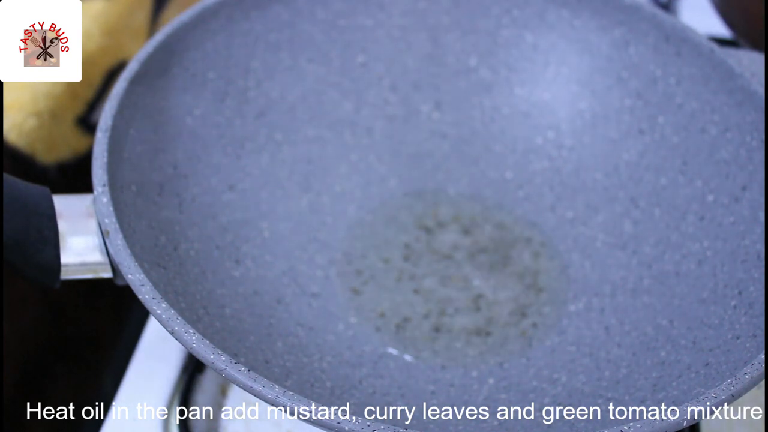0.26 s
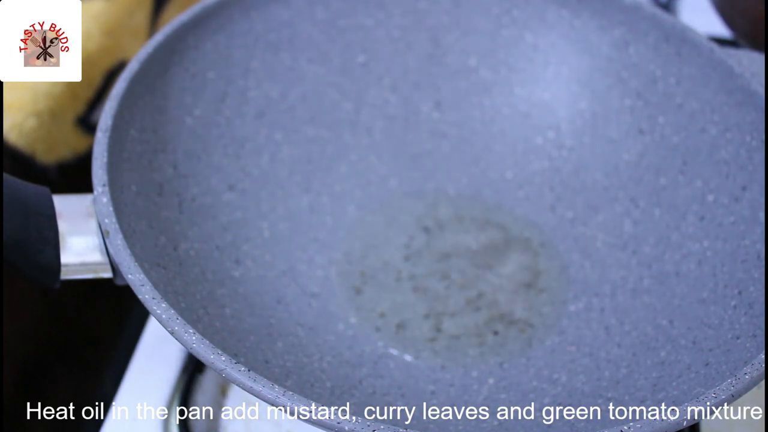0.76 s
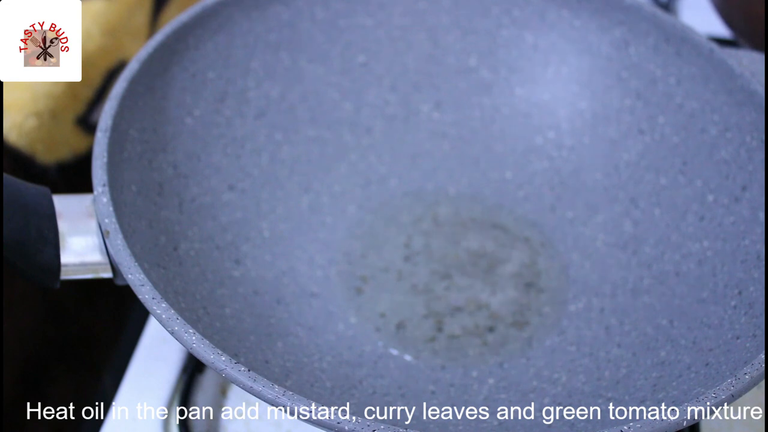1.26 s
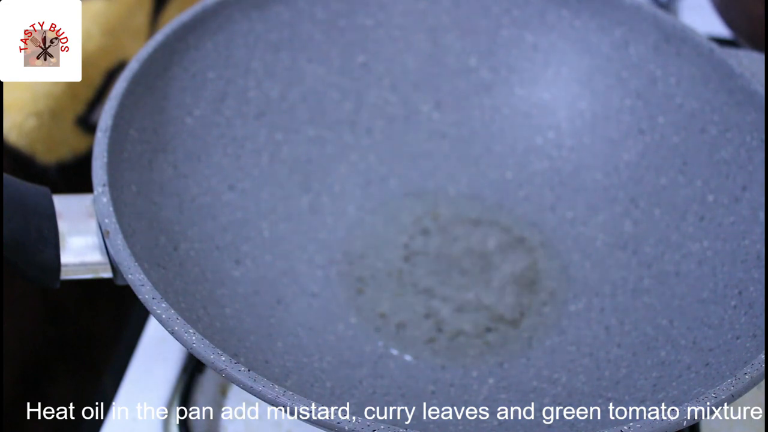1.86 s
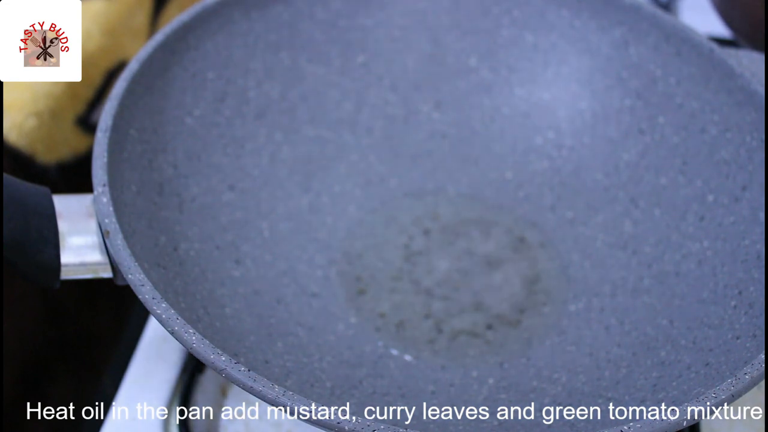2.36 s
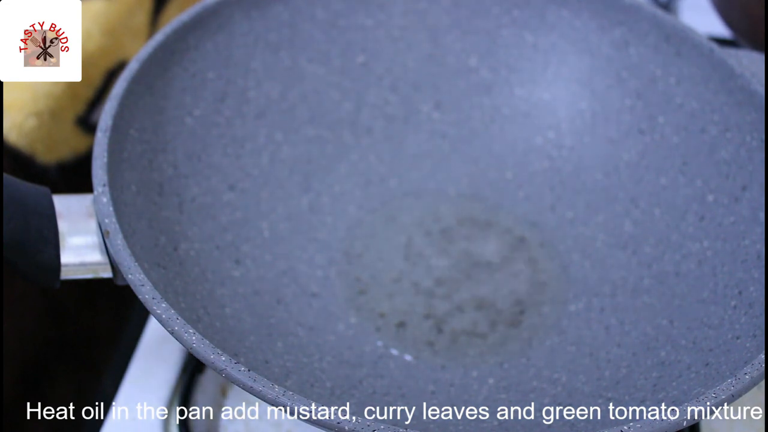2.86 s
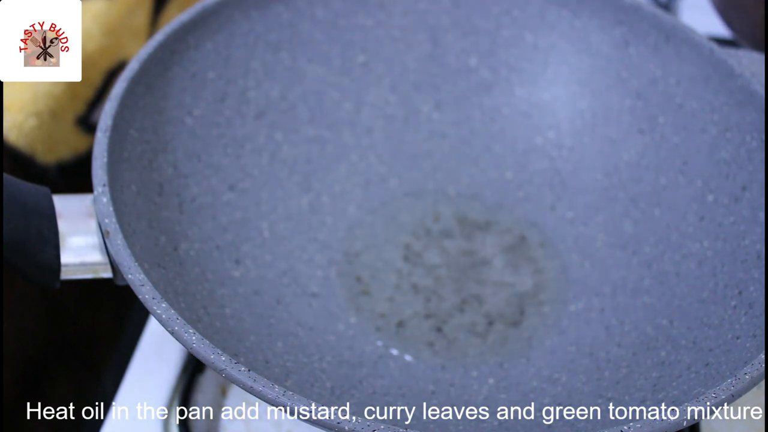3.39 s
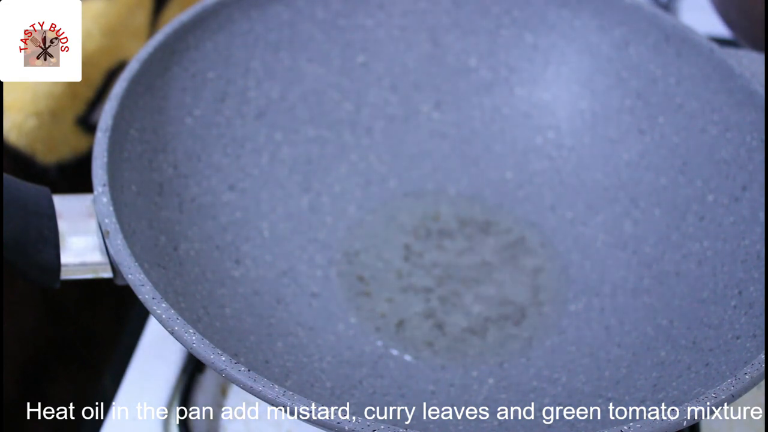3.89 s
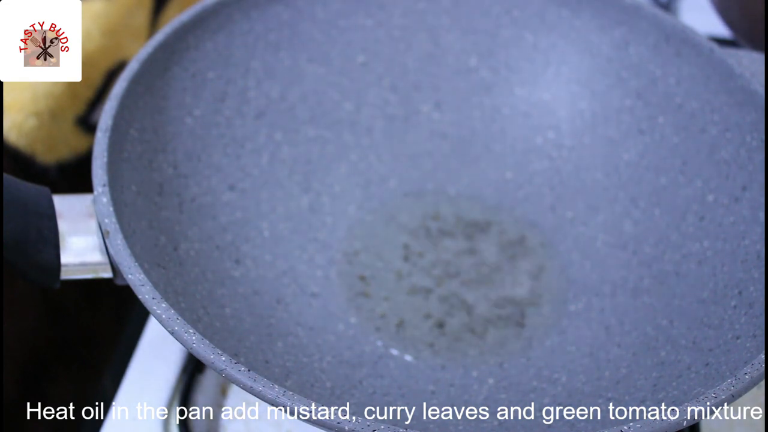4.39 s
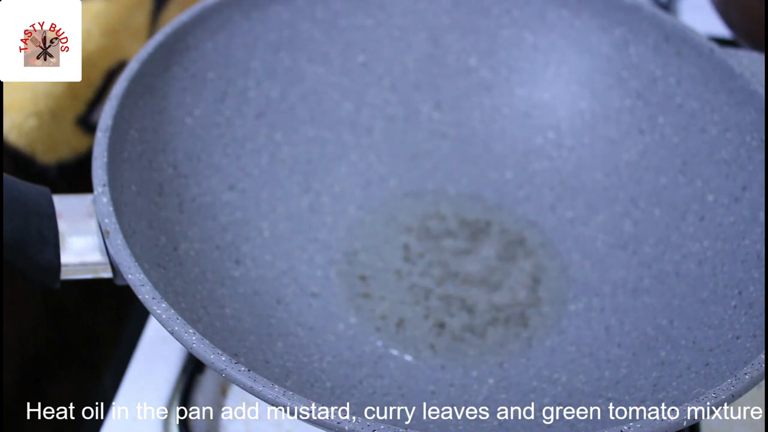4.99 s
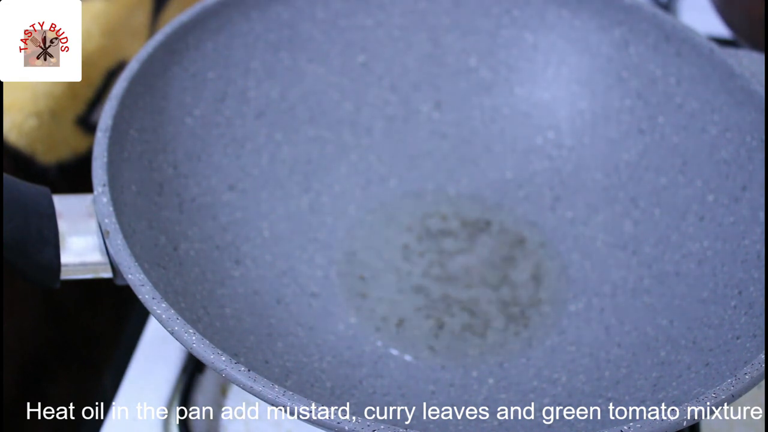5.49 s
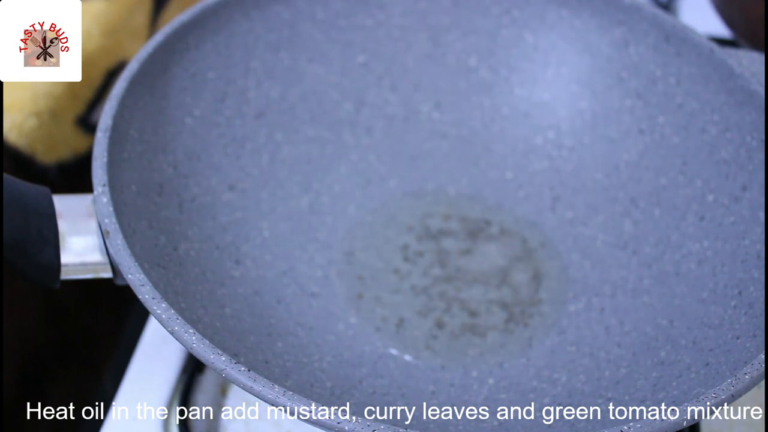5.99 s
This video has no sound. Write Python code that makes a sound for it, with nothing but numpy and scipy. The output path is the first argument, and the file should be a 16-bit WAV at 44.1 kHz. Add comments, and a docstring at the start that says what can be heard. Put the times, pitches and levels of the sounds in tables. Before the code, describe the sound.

A close mono pickup of mustard seeds spluttering in a pan on a stove. Loud cracks, some clipping slightly, mix with tiny ticks; each rings briefly in the bowl and scatters into a small reflective kitchen. Popping is busiest early, thins midway and returns in bursts to the end, over thin steady oil hiss and a faint wavering low hum.

```python
"""Mustard seeds pop in a little hot oil in a deep pan, in a small hard-walled kitchen.
Each pop is a minimum-phase crack whose two resonances are a pocket of steam ringing in the oil;
echoes, narrow modes of the pan's wall and a decaying noise tail throw it back.
The oil fizzes faintly, as coloured random ticks over noise, and a motor hums behind,
as wavering tones over a steady rush of air."""
import sys
import numpy as np
from scipy import signal
from scipy.fft import rfft, irfft
from scipy.io import wavfile

SR = 44100
rng = np.random.default_rng(int(sys.argv[2]) if len(sys.argv) > 2 else 0)


def inscribe(sig):
    """Save sig as 16-bit PCM at rate SR to the path in sys.argv[1].

    A 1-D sig is mono; a 2-D sig holds one channel per row.
    Samples are clipped to [-1, 1] before scaling.
    """
    pcm = np.round(np.clip(np.atleast_2d(sig).T, -1, 1) * 32767)
    wavfile.write(sys.argv[1], SR, pcm.astype(np.int16))


N = 275625   # samples, 6.25 s


def from_db(db):
    """Turns decibels into an amplitude factor."""
    return 10 ** (np.asarray(db) / 20)


def at_hz(points, hz):
    """Reads a table on a log-frequency axis, holding its end values beyond the ends."""
    known_hz, values = np.transpose(points)
    return np.interp(np.log(np.maximum(hz, 1)), np.log(known_hz), values)


def ring(x, hz, width_hz, boost_db):
    """A resonant peak applied twice: the ring swells for a cycle or two, then dies."""
    damping = np.pi * abs(width_hz) / SR
    gain = from_db(boost_db / 2)   # half the boost in each pass
    turn = -2 * np.cos(2 * np.pi * hz / SR)
    b = [1 + damping * gain, turn, 1 - damping * gain]
    a = [1 + damping, turn, 1 - damping]
    once = signal.lfilter(b, a, x)
    return signal.lfilter(b, a, once)


def crack(tilt_db_per_oct, size=1024):
    """The most abrupt pulse (minimum phase) with the crack's colour, tilted above 2 kHz."""
    # Colour of a crack before the tilt. Each row: frequency in Hz, level in dB.
    crack_colour = [(200, -29), (700, -18.5), (1500, -18.5), (2500, -13), (4000, -9), (6000, -6.5),
                    (8000, -1.5), (10000, -9.5), (12000, -21.5), (14500, -28), (16000, -50)]
    hz = np.fft.rfftfreq(size, 1 / SR)
    octaves = np.log2(np.maximum(hz / 2000, 1))
    level_db = at_hz(crack_colour, hz) + tilt_db_per_oct * octaves
    cepstrum = irfft(np.log(from_db(level_db)))
    # folding the cepstrum onto positive time gives minimum phase
    causal = 1 + np.sign(np.fft.fftfreq(size))
    return irfft(np.exp(rfft(cepstrum * causal)))


def burst(db, depth, hz, upper_hz, upper_db):
    """One pop: depth under the oil dulls the crack and makes the steam pocket ring stronger and purer."""
    depth = np.clip(depth, 0, 1)
    tilt_db_per_oct = 1.5 - 12.5 * depth
    ring_db = 0.5 + 27.5 * depth
    ring_width = 0.34 - 0.13 * depth   # share of the pitch
    pop = from_db(db) * crack(tilt_db_per_oct)
    pop = ring(pop, hz, hz * ring_width, ring_db)
    return ring(pop, upper_hz, width_hz=1430, boost_db=upper_db)


def small_blips(least_db, spread_db, low_hz, high_hz, depth, upper_hz, upper_db, count=48):
    """Faint pops at random, laid out like the louder ones; most are tiny, and they thin out with time."""
    when, size, pitch = rng.random((count, 3)).T
    times = N / SR * (when + when ** 3) / 2
    levels = least_db + spread_db * size ** 2
    pitches = low_hz * (high_hz / low_hz) ** pitch
    return [(s, db, depth, hz, upper_hz, upper_db) for s, db, hz in zip(times, levels, pitches)]


def pan_paths(scatter_db, scatter_t60, spread_s, size=1024):
    """Direct sound, scatter inside the pan and first echoes, drawn anew for each seed's place."""
    # Reflections from the pan's sides, the hob and a near wall.
    # Each row: delay in seconds before the random shift, level in dB.
    echoes = [(.00065, -23.5), (.00205, -11), (.0028, -20), (.00672, -10), (.0076, -14.5)]
    t = np.arange(size) / SR
    scatter = rng.standard_normal(size) * from_db(-60 * t / scatter_t60)
    scatter = scatter * (t > .0003)   # none in the first 0.3 ms
    paths = from_db(scatter_db) * scatter / np.linalg.norm(scatter)
    paths[0] = 1
    for delay, db in echoes:
        shifted = delay + spread_s * rng.normal()
        paths[int(np.clip(shifted * SR, 1, size - 1))] += from_db(db)
    return paths


def pan_wall(x):
    """The struck metal rings on in a few narrow modes."""
    # The pan wall's modes. Each row: frequency in Hz, gain at the peak in dB, t60 in seconds.
    pan_modes = [(1960, 8, 0.3), (2376, 5, 0.17), (2410, -5, 0.63), (2440, 4, 0.14), (2584, 2.5, 0.13),
                 (2914, -5.5, 0.34), (3024, 7.5, 0.13), (3200, 4, 0.13), (4000, -16, 0.16),
                 (4600, -31, 0.18)]
    out = 0
    for hz, db, t60 in pan_modes:
        r = from_db(-60 / (t60 * SR))   # decay per sample
        b = (1 - r * r) / 2 * np.array([1, 0, -1])
        a = [1, -2 * r * np.cos(2 * np.pi * hz / SR), r * r]
        out = out + from_db(db) * signal.lfilter(b, a, x)
    return out


def kitchen_tail(build_s, early_db, early_t60, count=9):
    """Diffuse reverberation of energy 1: a fast build, a strong early part, the treble dying sooner."""
    # Kitchen reverberation, before the early part is added. Each row: frequency in Hz, t60 in seconds.
    kitchen_decay = [(500, 0.65), (2500, 0.55), (5000, 0.44), (8000, 0.43), (14000, 0.28)]
    t = np.arange(SR * 3 // 4) / SR
    hz = np.fft.rfftfreq(len(t), 1 / SR)
    noise = rfft(rng.standard_normal(len(t)))
    centres = np.geomspace(500, 15000, count)
    tail = 0
    for centre, weights in zip(centres, np.eye(count)):
        band = irfft(noise * np.interp(hz, centres, weights), len(t))
        tail = tail + band * from_db(-60 * t / at_hz(kitchen_decay, centre))
    build = 1 - np.exp(-(t / build_s) ** 2)
    early = 1 + from_db(early_db - 60 * t / early_t60)
    tail = tail * build * early
    return tail / np.linalg.norm(tail)


def seeds(room_db, count=3):
    """Seeds burst at several places in the oil, each place with its own way into the room."""
    # The louder seed pops. Each row: start in seconds, crack level in dB, depth under the oil from 0 to 1,
    # ring frequency in Hz, upper ring frequency in Hz, upper ring boost in dB.
    loud_pops = [(-0.012, 13.5, 0.38, 2600, 4500, 2), (0.1578, -11.0, 0.82, 2460, 9000, 0.0),
                 (0.2175, -7.5, 0.7, 3630, 9000, 0.0), (0.2233, 10, 0.42, 2320, 6300, 6.5),
                 (0.2507, -1.5, 0.3, 3600, 8350, 6.0), (0.29, -3.5, 0.41, 2030, 3380, 16.0),
                 (0.3374, 8.5, 0.26, 2070, 5460, 6.5), (0.3911, -2.5, 0.67, 2400, 9000, 2.0),
                 (0.4082, -4.5, 0.72, 2980, 3580, 4.5), (0.4553, -3.5, 0.39, 4300, 7440, 11.5),
                 (0.5837, 5, 0.33, 2720, 5100, 6.5), (0.6202, 9.5, 0.63, 2290, 3400, 6.5),
                 (0.7328, -7, 0.66, 3020, 9000, 0.0), (0.8653, -7, 0.48, 2260, 4400, 17),
                 (0.8868, 7, 0.42, 2370, 5360, 7), (0.8925, 7.5, 0.57, 4180, 6500, 13.5),
                 (0.9547, -2, 0.8, 2360, 3400, 2.5), (0.9964, -0.5, 0.13, 2000, 5200, 3),
                 (1.0604, -8.5, 0.6, 3490, 9000, 0.0), (1.1145, -11.5, 0.84, 2390, 4600, 9),
                 (1.1693, 4.0, 0.23, 3440, 4900, 8.5), (1.2172, 1.5, 0.49, 2720, 3800, 11.5),
                 (1.2382, 15.0, 0.47, 2170, 3480, 10.0), (1.2518, -1.5, 0.22, 3180, 6900, 17),
                 (1.3288, -6.0, 1, 3620, 6300, 1.0), (1.3614, 1.5, 0.58, 2330, 3480, 9.5),
                 (1.3842, -2, 0.82, 2820, 7500, 3.0), (1.4518, -3.5, 0.04, 2000, 7900, 1),
                 (1.5134, 7.5, 0.86, 2570, 4700, 8), (1.5756, 7.5, 0.66, 2310, 4000, 11.5),
                 (1.7091, 1.5, 0.65, 2660, 3700, 5.5), (1.7494, -4, 0.4, 2370, 4500, 11.0),
                 (1.7811, 12.0, 0.12, 2560, 5650, 7.0), (1.8467, 3, 0.84, 3070, 5400, 7.5),
                 (1.8686, -1.5, 0.5, 2840, 6660, 15.5), (1.8996, -0.5, 0.85, 3100, 6400, 17.5),
                 (1.9034, 2.5, 0.53, 2490, 4570, 12.5), (2.0836, -7, 0.64, 3030, 4500, 5),
                 (2.261, -7.5, 0.25, 3130, 3020, 20.5), (2.3129, 1.5, 0.57, 3440, 5030, 11),
                 (2.3808, 1.0, 0.18, 2290, 7200, 3), (2.4312, 10.5, 0.22, 2730, 6700, 3.5),
                 (2.4638, 13, 0.6, 2440, 6050, 9.0), (2.8434, 5.0, 0.59, 2660, 6100, 3.0),
                 (2.9651, 7.5, 0.96, 2430, 3360, 3.5), (3.0973, 6.0, 1.0, 2430, 5000, 1.5),
                 (3.1964, 6.5, 0.62, 2550, 2880, 6.5), (3.2745, -12, 0.3, 3220, 3700, 18.5),
                 (3.2957, 6.5, 0.51, 3050, 4600, 6.5), (3.305, 6.5, 0.59, 3640, 6040, 10),
                 (3.3904, 11, 0.63, 2350, 3370, 9.5), (3.3944, 8, 0.42, 3240, 8550, 8),
                 (3.5048, 0.0, 0.45, 3000, 7500, 8), (3.518, -3.5, 0.43, 3120, 4800, 12),
                 (3.556, 4.5, 0.65, 2960, 4960, 11.5), (3.7851, 10.0, 0.1, 2000, 7200, 2.5),
                 (3.8415, -14.5, 0.52, 2110, 3900, 21.5), (3.8707, -14.0, 0.51, 2420, 6800, 16.5),
                 (3.9253, 0.5, 0.77, 2850, 4700, 13.5), (3.947, 7, 0.78, 2670, 5400, 13),
                 (3.9619, -3.0, 0.61, 2640, 3930, 20.5), (4.2103, -14.5, 0.55, 2500, 3800, 6.5),
                 (4.5165, -6, 0.4, 3200, 7400, 12.5), (4.544, 6, 0.0, 2010, 5250, 3.5),
                 (4.5956, -0.5, 0.71, 2730, 5000, 5), (4.6479, 6.5, 0.91, 2700, 5500, 9.5),
                 (4.6744, 9.0, 0.8, 2480, 4200, 6), (5.0541, -8.5, 0.52, 2180, 3900, 16.5),
                 (5.153, -10.0, 0.71, 4170, 9000, 0.0), (5.2399, 10, 0.49, 2350, 4700, 10.5),
                 (5.2432, 11.5, 0.45, 2530, 5100, 10.5), (5.3192, -8, 0.9, 3580, 5000, 6.5),
                 (5.3578, 6.0, 0.61, 2540, 4270, 8.5), (5.4224, 10, 0.1, 2120, 9100, 1.5),
                 (5.4852, 6, 0.79, 2510, 4340, 13.5), (5.6308, -1.0, 0.6, 3640, 6900, 15.5),
                 (5.7202, 1.5, 0.72, 2610, 5840, 13), (5.8113, -8.5, 0.52, 3000, 7200, 6)]
    lead = SR // 2   # the popping is already under way
    places = np.zeros((count, N + 2 * lead))
    near = np.zeros(N + 2 * lead)
    blips = small_blips(least_db=-23.5, spread_db=10, low_hz=2440, high_hz=4450,
                        depth=0.54, upper_hz=7500, upper_db=10.5)
    for k, (s, *seed) in enumerate(list(loud_pops) + blips):
        pop = burst(*seed)
        paths = pan_paths(scatter_db=-5.5, scatter_t60=0.015, spread_s=.00005)
        heard = signal.fftconvolve(pop, paths)
        at = lead + int(s * SR)
        near[at:at + len(heard)] += heard
        places[k % count, at:at + len(pop)] += pop
    room = np.zeros(len(near))
    for place in places:
        tail = kitchen_tail(build_s=0.0035, early_db=4.5, early_t60=0.11)
        room += signal.fftconvolve(place, tail)[:len(near)]
    # the bowl throws this band into the room most strongly
    room = ring(room, hz=2425, width_hz=160, boost_db=3.5)
    mix = near + pan_wall(places.sum(0)) + from_db(room_db) * room
    return mix[lead:lead + N]


def drift(rate):
    """Slow chance with spread 1, its swings above the rate in Hz fading away."""
    hz = np.fft.rfftfreq(N, 1 / SR)
    slow = irfft(rfft(rng.standard_normal(N)) / (1 + (hz / rate) ** 2), N)
    return slow / slow.std()


def coloured(white, spectrum):
    """Gives a white signal of rms 1 a spectrum in dB per Hz."""
    hz = np.fft.rfftfreq(N, 1 / SR)
    return irfft(rfft(white) * from_db(at_hz(spectrum, hz)) * np.sqrt(SR / 2), N)


def oil_fizz(per_s, spread_db, wash):
    """Tiny bubbles burst at random, in flurries, over a wash of noise: the room's smear of soft hiss."""
    # Fizz of the oil before the simmer level. Each row: frequency in Hz, level in dB per Hz.
    fizz_colour = [(800, -110), (2500, -96.5), (4500, -98), (8200, -92.5), (10000, -100), (12000, -108),
                   (14800, -118), (16000, -130)]
    # How lively the oil is. Each row: time in seconds, fizz gain in dB.
    simmer = [(0, 1.5), (1, 1.5), (2, 0), (3, 1.5), (4.2, 1.5), (5, 0), (6.25, -1.5)]
    size_db = spread_db * np.minimum(rng.exponential(1, N), 5)
    sizes = from_db(size_db) * rng.choice([-1, 1], N)
    flurry = from_db(4.9 * drift(rate=21))   # multiplies the tick rate
    ticks = sizes * (rng.random(N) < per_s * flurry / SR)
    white = ticks / ticks.std() + wash * rng.standard_normal(N)
    level_db = np.interp(np.arange(N) / SR, *np.transpose(simmer))
    return from_db(level_db) * coloured(white / white.std(), fizz_colour)


def wavering_tone(hz, waver, rate):
    """A tone of rms 1, part steady and part wandering in level and phase."""
    phase = 2 * np.pi * (hz * np.arange(N) / SR + rng.random())
    share = np.clip(waver, 0, 1)
    steady = np.sqrt(2 * (1 - share ** 2))
    in_phase = (steady + share * drift(rate)) * np.sin(phase)
    return in_phase + share * drift(rate) * np.cos(phase)


def motor(waver_rate):
    """Wavering hum lines and a drone that dips, swells and sinks, over a steady rush of air."""
    # Motor hum. Each row: frequency in Hz, level in dB rms, waver from 0 to 1.
    hum_lines = [(51, -72, 0.7), (100.2, -63.5, 0.34), (150.8, -66, 0.45), (243.8, -61.5, 0.44),
                 (356.4, -64, 0.88), (456, -64.5, 0.72), (492, -65.5, 0.54)]
    # Level of the hum's main tone. Each row: time in seconds, level in dB rms.
    drone_level = [(0, -53), (.65, -61), (.9, -51.5), (2.3, -53.5), (3.7, -59.5), (4.65, -62), (5.4, -58),
                   (6.25, -60)]
    # Rush of air around the motor. Each row: frequency in Hz, level in dB per Hz.
    air_colour = [(25, -100), (56, -91.5), (76, -91), (125, -88.5), (165, -83), (205, -74), (270, -79.5),
                  (345, -73), (415, -80.5), (470, -77.5), (550, -84), (1000, -85), (1600, -91),
                  (16000, -128)]
    hum = sum(from_db(db) * wavering_tone(hz, waver, waver_rate) for hz, db, waver in hum_lines)
    drone_db = np.interp(np.arange(N) / SR, *np.transpose(drone_level))
    drone = from_db(drone_db) * wavering_tone(196.4, waver=0.52, rate=10)
    air = coloured(rng.standard_normal(N), air_colour)
    return hum + drone + air


def scene():
    """Pops over fizz and hum, in mono."""
    pops = seeds(room_db=-3.5)
    fizz = oil_fizz(per_s=1000, spread_db=3.5, wash=2.4)
    return (pops + fizz + motor(waver_rate=1.9))[None]


def record(dry):
    """The highest peaks are clipped and the top is cut steeply."""
    peak_limit, cutoff_hz = .88, 16300   # limit as a share of full scale
    clipped = np.clip(dry, -peak_limit, peak_limit)
    low_pass = signal.ellip(10, .1, 80, cutoff_hz, fs=SR, output="sos")
    return signal.sosfilt(low_pass, clipped)


dry = scene()
out = record(dry)
inscribe(out)
```